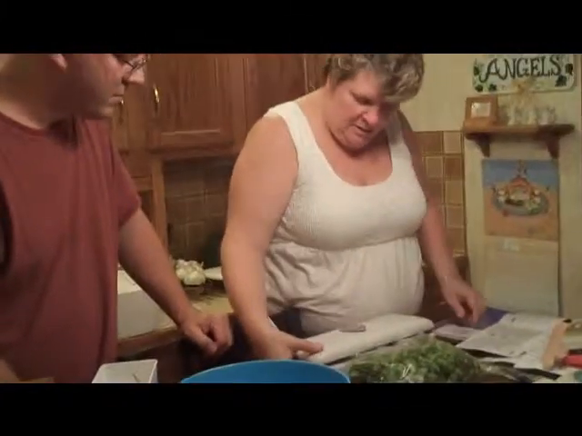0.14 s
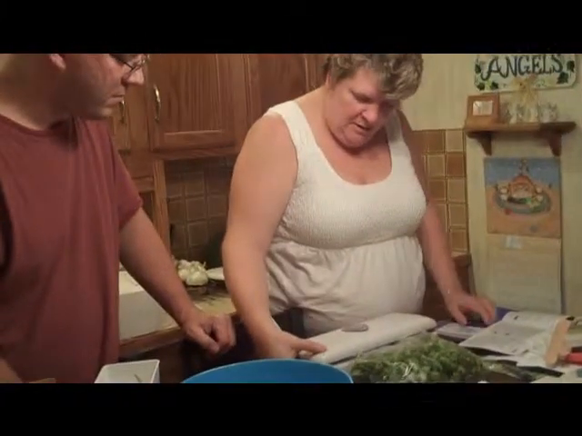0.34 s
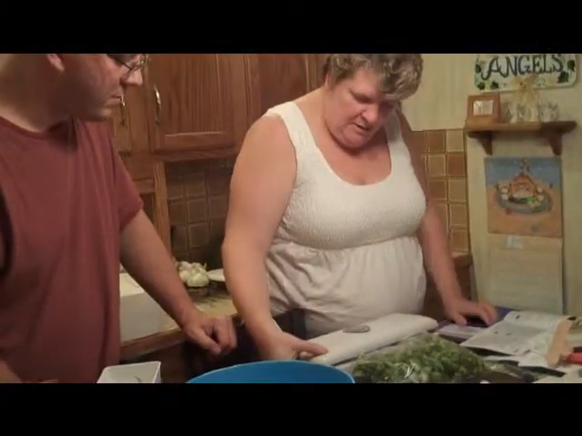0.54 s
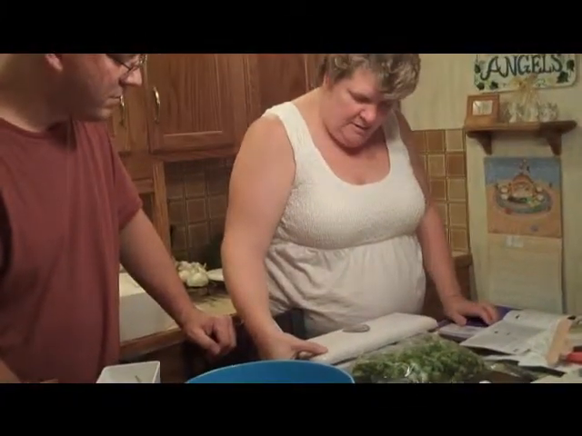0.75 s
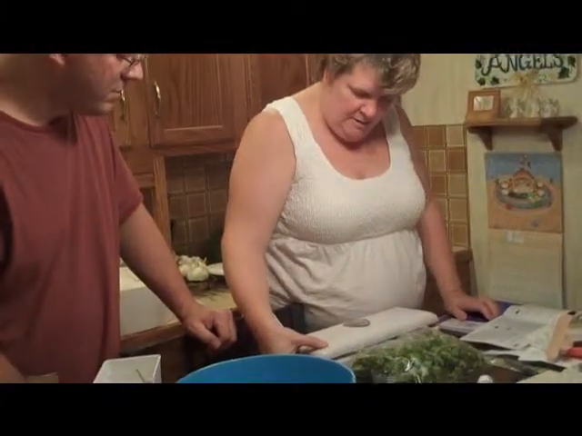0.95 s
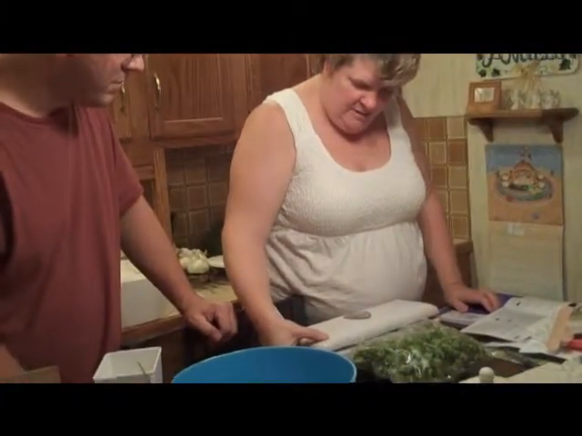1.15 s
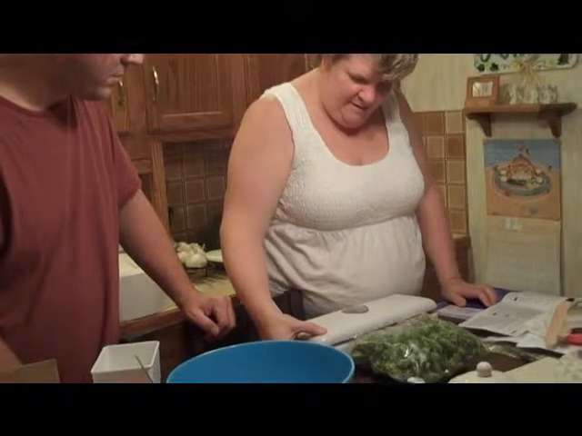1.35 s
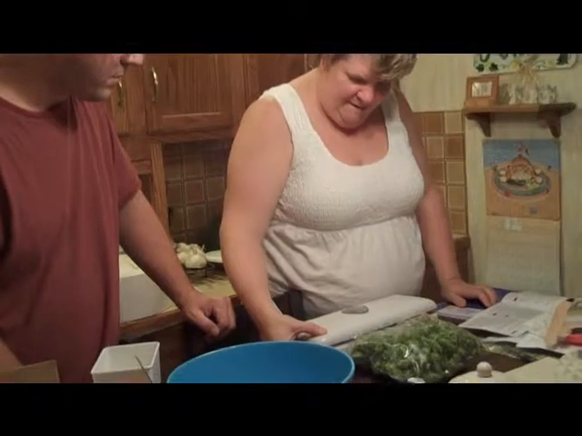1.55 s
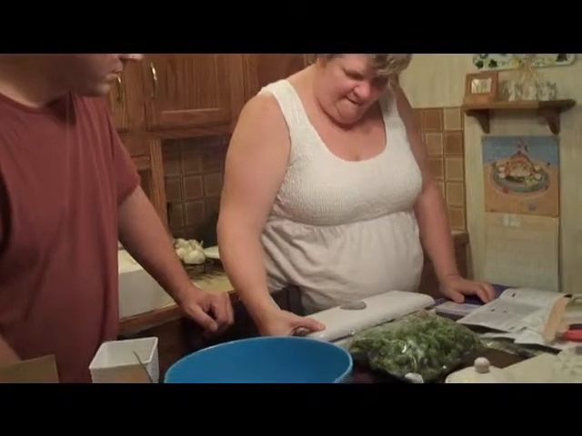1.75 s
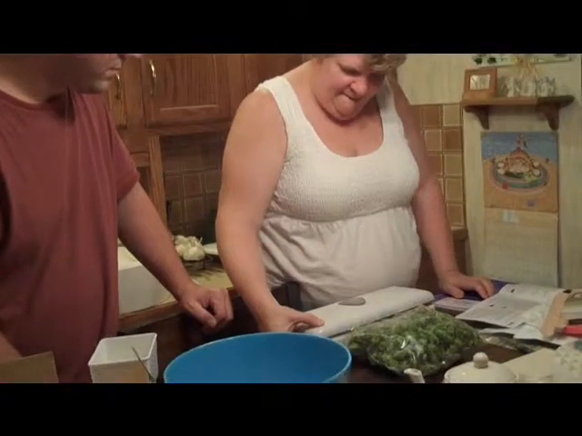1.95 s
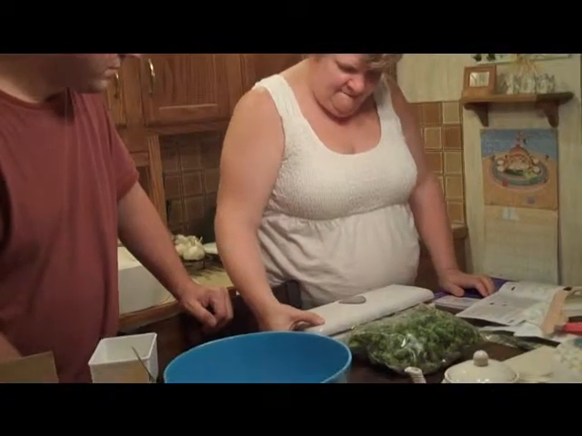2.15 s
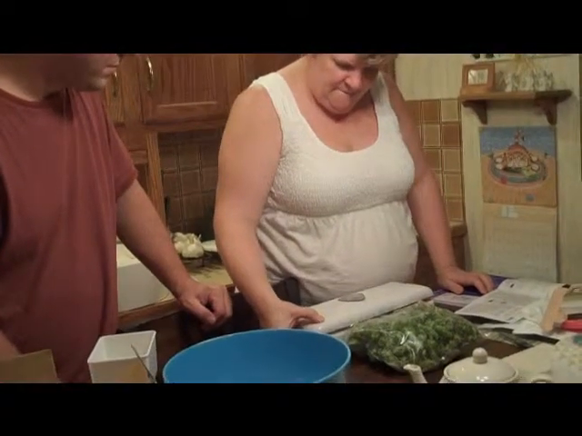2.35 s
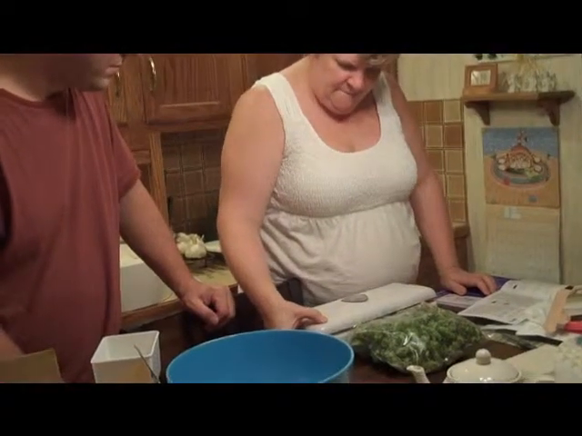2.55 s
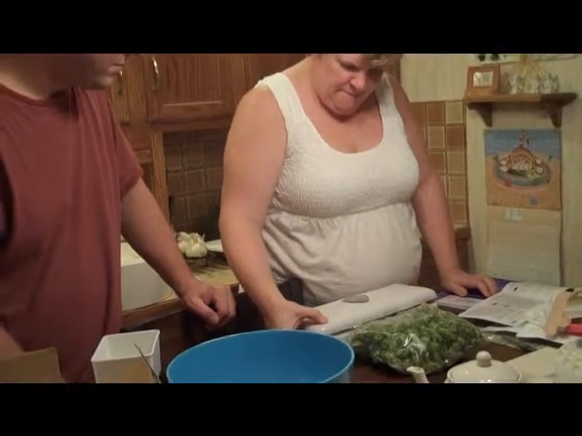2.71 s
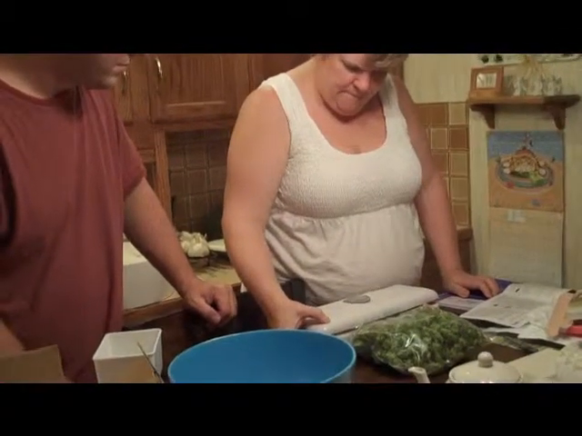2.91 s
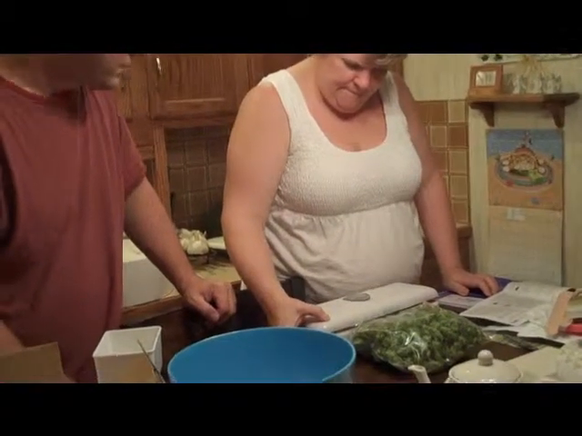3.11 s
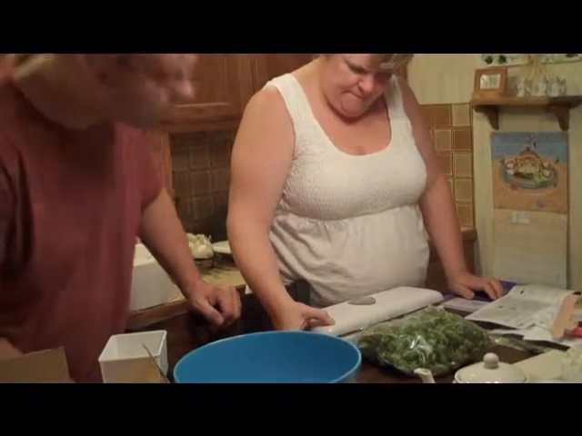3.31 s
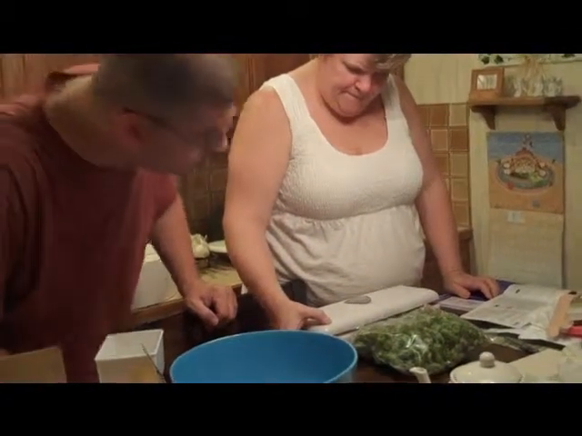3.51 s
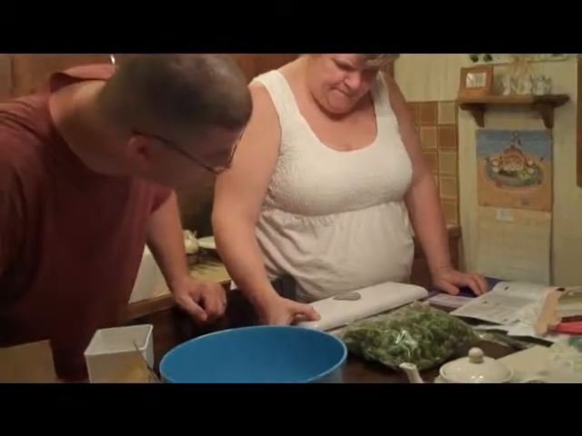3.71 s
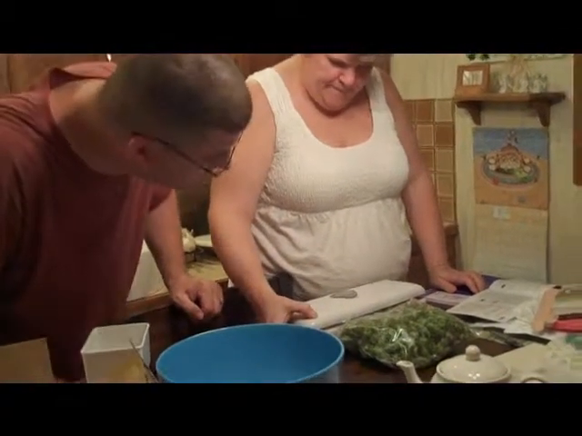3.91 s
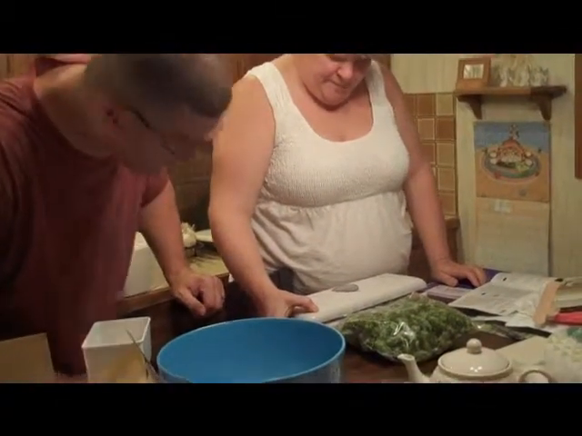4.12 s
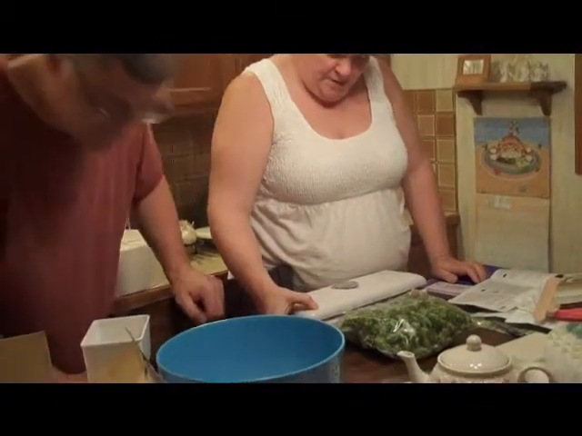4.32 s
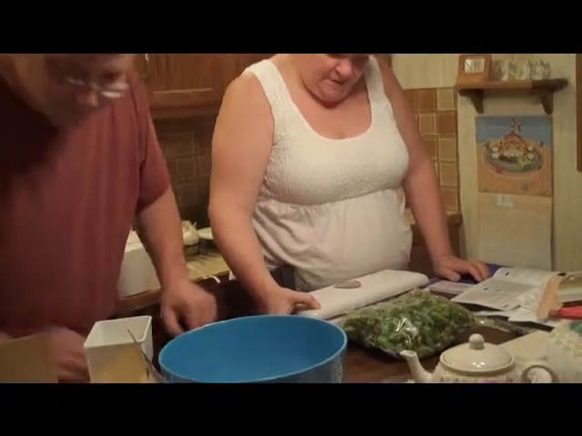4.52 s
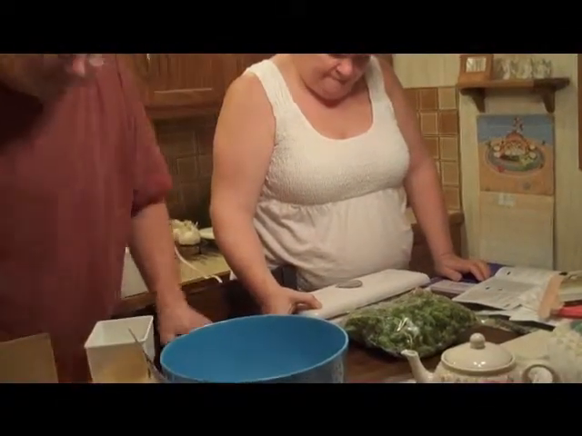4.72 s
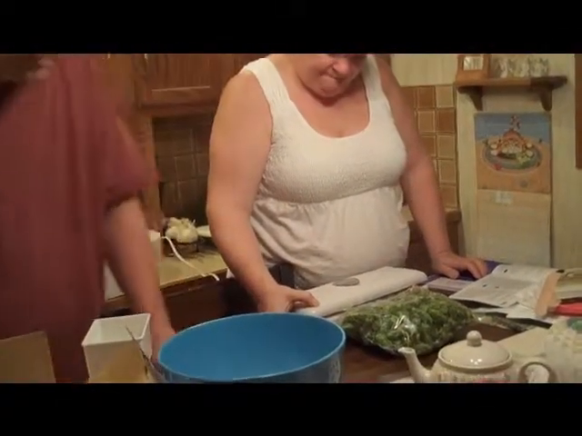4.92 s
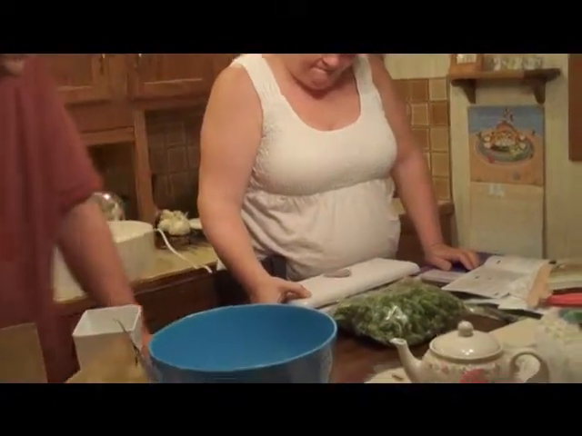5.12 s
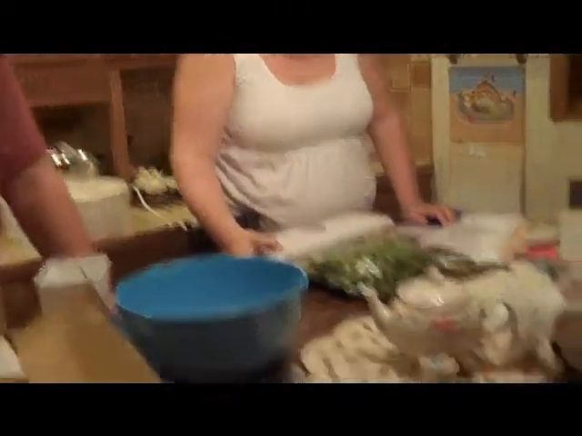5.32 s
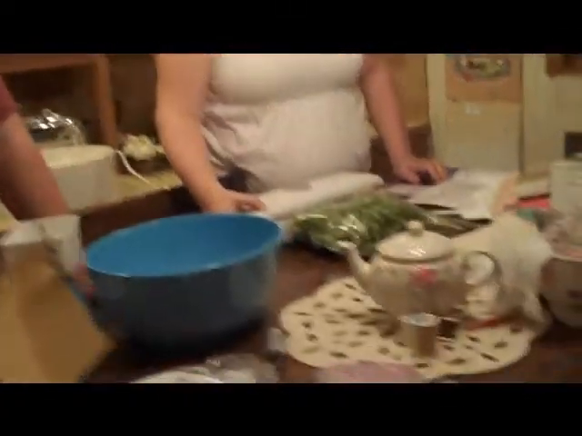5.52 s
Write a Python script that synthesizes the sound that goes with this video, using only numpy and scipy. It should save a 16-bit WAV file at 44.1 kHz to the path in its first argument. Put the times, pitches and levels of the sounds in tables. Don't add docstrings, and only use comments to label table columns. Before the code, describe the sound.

A quiet kitchen with faint mains hum, then a crisp plastic switch click. A countertop vacuum sealer knocks unevenly as its motor starts, sweeps quickly upward in pitch, and settles into a loud, nasal whine with brushy air hiss. The whine creeps very slightly higher until the end. Close stereo handheld microphone, small hard room, treble stronger on the left.

```python
import sys
import numpy as np
from scipy import signal
from scipy.io import wavfile
from scipy.ndimage import uniform_filter1d

SR = 44100
rng = np.random.default_rng(int(sys.argv[2]) if len(sys.argv) > 2 else 0)


def invert_db(level):
    return 10 ** (np.asarray(level, dtype=float) / 20)


def put_to_file(sound):
    columns = np.atleast_2d(sound).T
    safe = np.clip(columns, -1, 1)
    whole_steps = np.round(safe * 32767)
    wavfile.write(sys.argv[1], SR, whole_steps.astype(np.int16))


N = 249517
TIME = np.arange(N) / SR

# frequency in Hz, left level in dB, right level in dB, likeness of the two sides (1 = same).
HISS_COLOUR = [(60, -19, -18, 1), (204, -15.5, -15, 0.97), (298, -4, -5, 0.98), (676, -0.5, 0.5, 0.95),
               (1300, 0.5, -1, 0.76), (2950, -2, -4, 0.2), (3220, -4, -1.5, 0.22),
               (4200, -7.5, -10.5, 0.88), (5420, -9, -6.5, 1), (5760, -14, -6.5, 1), (7930, 10, -9, 0.73),
               (8740, -10, -23, 0.064), (9500, -17, -56, 0.13), (11700, -2.5, -37, .2)]


def in_time(rows):
    seconds, *columns = np.transpose(rows)
    return [np.interp(TIME, seconds, column) for column in columns]


def at_hz(table, hz, axis=1):
    table = np.array(table)
    return np.interp(np.log(hz), np.log(table[:, 0]), table[:, axis])


def drift(rate_hz):
    step = 40
    r = np.exp(-2 * np.pi * rate_hz * step / SR)
    slow = signal.lfilter([1], [1, -2 * r, r * r], rng.standard_normal(N // step + 2002))[2000:]
    return np.interp(np.arange(N) / step, np.arange(len(slow)), slow / slow.std())


def banded_noise(left_db, right_db, alike, band_gain):
    out, power = 0, 0
    edges_hz = 30 * 2 ** (np.arange(28) / 3)
    white = rng.standard_normal((2, 2, N))
    for k, (low, high) in enumerate(zip(edges_hz, edges_hz[1:])):
        band_pass = signal.butter(2, [low, high], "band", fs=SR, output="sos")
        mid, side = signal.sosfilt(band_pass, white[k % 2])
        hz = np.sqrt(low * high)
        likeness = np.clip(alike(hz), 0, 1)
        shared = np.sqrt(1 + likeness) * mid
        opposed = np.sqrt(1 - likeness) * side * [[1], [-1]]
        band = invert_db(np.array([[left_db(hz)], [right_db(hz)]])) * (shared + opposed)
        power = power + np.mean(band ** 2)
        out = out + band * band_gain(hz)
    return out / np.sqrt(power)


def ring(clicks, hz, t60):
    r, w = invert_db(-60 / (t60 * SR)), 2 * np.pi * hz / SR
    return signal.lfilter([0, np.sin(w)], [1, -2 * r * np.cos(w), r * r], clicks + 1e-18)


def room_floor():
    # frequency in Hz, noise level in dB.
    floor_colour = [(30, -4), (60, 5.5), (85, -16), (150, -2), (300, 2), (550, -8.5), (1000, 0),
                    (2100, -1.5), (4500, -13), (7500, -52), (9000, -40), (11000, -24), (13000, -46)]
    # frequency in Hz, left minus right in dB.
    floor_lean = [(60, -4), (110, 4), (200, 4), (360, -4), (640, -3), (1160, -11), (2100, -2), (3800, -5),
                  (6880, -20), (12400, 29)]
    # hum frequency in Hz, level in dB.
    mains_hum = [(60, -72), (120, -75.5), (180, -73), (240, -71)]
    floor_db = -53.5

    def left_db(hz):
        return at_hz(floor_colour, hz) + at_hz(floor_lean, hz) / 2

    def right_db(hz):
        return at_hz(floor_colour, hz) - at_hz(floor_lean, hz) / 2

    def alike(hz):
        return 0.8 - 0.027 * np.log2(hz / 100)

    noise = banded_noise(left_db, right_db, alike, lambda hz: 1)
    hum = sum(invert_db(db) * np.sqrt(2) * np.sin(2 * np.pi * hz * TIME) for hz, db in mains_hum)
    return invert_db(floor_db) * noise + hum


def switch():
    # time in seconds, peak in dB.
    contacts = [(0.366, -43), (.3695, -47), (.3742, -46), (0.3755, -29), (.3762, -25), (.3770, -20),
                (0.378, -21), (0.3793, -23), (0.3801, -26), (.3812, -27), (0.3840, -30), (.3875, -33)]
    # frequency in Hz, level in dB, time to die by 60 dB in seconds.
    plastic_modes = [(1280, -23, 0.0073), (2510, -8, 0.013), (3100, -18, 0.0066), (3650, -12, 0.011),
                     (4300, 1, 0.0063), (4960, 8, 0.0014), (6130, 5, 0.0059), (6130, -20, 0.0078),
                     (6900, -1, 0.0029), (8000, -8, 0.01), (9170, -9, 0.011)]
    kitchen_t60_s = 0.18

    at = [round(s * SR) for s, db in contacts]
    contact_db = np.array(contacts)[:, 1]
    click = np.zeros(SR)
    strength = rng.normal(0, 1, (len(at), len(plastic_modes)))
    for (hz, level_db, t60), chance in zip(plastic_modes, strength.T):
        strikes = np.zeros(SR)
        strikes[at] = invert_db(contact_db + level_db - 4.5 + 2.7 * chance) * np.sign(chance[::-1])
        click += ring(strikes, hz, t60)
    click = signal.sosfilt(signal.butter(2, [1300, 8800], "band", fs=SR, output="sos"), click)

    lag_s = np.arange(SR // 2) / SR
    echoes = rng.standard_normal((2, len(lag_s))) * invert_db(-60 * lag_s / kitchen_t60_s) * (lag_s > 0.003)
    tail = signal.fftconvolve(click[None], echoes, axes=1)[:, :SR]
    direct = click * invert_db(np.array([[-0.5], [0.5]]))
    return np.pad(direct + invert_db(-30.5) * tail, ((0, 0), (0, N - SR)))


def start_judder(turns):
    # time in seconds, judder level in dB.
    judder_level = [
        (.428, -80),
        (.436, -40),
        (.46, -48),
        (.5, -39.5),
        (.55, -38.5),
        (.6, -49),
        (.68, -39.5),
        (.75, -45),
        (.85, -78),
    ]
    # frequency in Hz, level in dB, time to die by 60 dB in seconds.
    judder_modes = [(665, -1, 0.24), (910, -3, 0.019), (1235, 9, 0.031), (1460, 7, 0.045), (2560, 0, 0.018)]

    knocks = np.diff(np.floor(turns + 0.15 * drift(60.0)), prepend=0) > 0
    out = sum(ring(knocks * invert_db(db + 4 * drift(40.0)), hz, t60) for hz, db, t60 in judder_modes)
    out = signal.sosfilt(signal.butter(4, 520, "high", fs=SR, output="sos"), out)
    starting = TIME < judder_level[-1][0]
    return invert_db(in_time(judder_level)[0]) * out / out[:SR].std() * starting


def pump_hiss(turns, hiss_db, tilt_db):
    throb = 1 + 0.051 * np.cos(2 * np.pi * turns) + 0.08 * np.cos(4 * np.pi * turns)
    together = drift(4.5)

    def patch(hz):
        return invert_db(tilt_db * np.log2(hz / 2000) + 0.5 * together + 0.58 * drift(11.0))

    hiss = banded_noise(lambda hz: at_hz(HISS_COLOUR, hz),
                        lambda hz: at_hz(HISS_COLOUR, hz, axis=2),
                        lambda hz: at_hz(HISS_COLOUR, hz, axis=3), patch)
    hiss = signal.sosfilt(signal.butter(3, 8600, fs=SR, output="sos"), hiss)
    return invert_db(hiss_db) * throb * hiss


def wall_ripple_db(hz):
    echo_delays = [.0031, .0057, .0093, .0141, .0219]
    grid_hz = np.arange(0, 13000, 4.0)
    echoes = sum(np.exp(2j * np.pi * grid_hz * lag) for lag in echo_delays)
    ripple = np.abs(1 + 0.42 * echoes) + 0.15
    return np.interp(hz, grid_hz, 20 * np.log10(ripple) - 3)


def casing_db(hz):
    # frequency in Hz, half width in Hz, level in dB.
    casing_rings = [(496, 95, -28), (639, 26, 13), (900, 14, 5), (925, 18, -1), (977, 32, 9), (1240, 45, 8),
                    (1450, 35, 5.5), (1510, 68, 11), (1638, 14, 12), (1685, 10, 5), (2320, 82, 2),
                    (2690, 170, 5.5), (5860, 600, -0.5), (9600, 370, -4)]
    # frequency in Hz, half width in Hz, level in dB.
    nulls = [(330, 3, -8), (695, 6, -9), (775, 25, -14), (970, 9, -12), (1105, 30, -17), (1200, 10, -14),
             (1320, 14, -10), (1392, 8, -9), (1482, 5, -8), (1540, 8, -10), (1580, 7, -22), (1632, 4, -16),
             (1657, 4, -14), (1735, 18, -6)]
    lid, motor_shell = (4300, 300, 6.0), (7450, 280, 11.0)
    rings = casing_rings + nulls + [lid, motor_shell]
    deep_db = 40 * np.minimum(np.log2(hz / 290), 0)
    return deep_db + sum(db / (1 + ((hz - centre_hz) / width_hz) ** 2) for centre_hz, width_hz, db in rings)


def motor_tones(speed, turns, tones_db):
    # multiple of the turning rate, level in dB, growth in dB per second,
    # left minus right in dB.
    orders = [(1, -42, 0.5, -2), (2, -51.5, -1.5, -1), (3, -38, 3.25, 0.5), (4, -47.5, -2.5, 1),
              (5, -38.5, 0.43, -1), (6, -45, -1, -1), (7, -43.5, 0.0, -2.5), (8, -40, 2.5, -3),
              (9, -48, -0.5, 4), (10, -46.5, 1.95, -4.5), (11, -88, 2.5, 2), (12, -48.5, 1.5, -4),
              (13, -53, -0.8, -2), (14, -59, 3, 26), (15, -59, 0.5, -2), (16, -47, 2, -7),
              (17, -48, -0.4, 6), (18, -48, 0, -13), (19, -81, 7, 10), (20, -45.5, 0.5, 2.5),
              (21, -45, -1.5, 23), (22, -42.5, 4, 23), (23, -47, -1, 13), (24, -57, -4, 7),
              (25, -60, -0.5, 8), (26, -91, -5, 12), (29, -75, -6, 20), (30, -54, -0.6, 36),
              (32, -62.5, -5.5, 48), (34, -63, -2.5, 37)]
    # time in seconds,
    # order, change in dB, half length in seconds.
    swells = [(5.56, 1, 7.5, 0.29), (1.26, 1, 8.5, 0.51), (5.3, 2, 9.5, 0.48), (1.42, 2, 11.5, 0.35),
              (1.1, 3, -6, 0.38), (4.3, 3, 2.6, .11), (0.88, 15, 4.5, .12), (4.89, 3, -3.5, 0.086),
              (5.16, 3, -4.5, 0.11), (4.64, 4, 5, 0.31), (5.27, 4, 14.5, 0.36), (3.15, 5, 6, 0.69),
              (4.31, 5, 5.5, 0.1), (4.61, 5, -4.1, 0.16), (5.59, 5, 7, 0.074), (2.1, 15, 6, .45),
              (3.81, 6, 7.5, 0.17), (5.34, 6, 9, 0.32), (4.4, 7, -8, 0.45), (4.5, 8, 3.5, 0.36),
              (5.11, 8, 5, 0.25), (5.54, 8, -8.5, 0.16), (3.61, 10, 5.5, 0.38), (.68, 20, 0, 0.15),
              (1.45, 21, 7.5, 0.53), (4.7, 21, 2.5, 0.45), (1.38, 22, 14, 0.15), (3.65, 22, 4.1, .21),
              (5.41, 22, -7.5, 0.17), (0.48, 30, -2, 0.049)]
    # frequency in Hz, lead in radians.
    left_lead = [(360, 0.15), (1450, -0.029), (1800, -0.51), (2500, 0.63), (3600, -0.71), (6500, -0.95),
                 (8300, -1.2), (11500, -2.17)]
    slots = 5
    top_slot_order = 30

    out = np.zeros((2, N))
    running = np.clip((TIME - 0.41) / 0.02, 0, 1)
    slow_time = TIME[::32]
    acceleration = np.gradient(speed) * SR
    gliding = np.clip(acceleration / 30, 0, 1)
    rushing = np.clip(acceleration / 90, 0, 1)
    for k, level_db, growth_db, lean_db in orders:
        hz = k * speed
        final_hz = hz[-1]
        left, right = (at_hz(HISS_COLOUR, hz, axis=c) - at_hz(HISS_COLOUR, final_hz, axis=c) for c in (1, 2))
        lean = lean_db + left - right + (0.096 + 0.023 * min(k, 10)) * drift(1.1)

        colour = casing_db(hz[::32]) - casing_db(final_hz)
        for s, order, db, half_s in swells:
            if order == k:
                colour = colour + db * np.exp(-((slow_time - s) / half_s) ** 2)

        level = level_db + growth_db * np.maximum(TIME - 3.6, -2) + tones_db
        level = level + np.interp(TIME, slow_time, colour) + 0.14 * np.maximum(left, right)
        ripple_share = 1.4 if k > slots else 0.3
        level = level + rushing * ripple_share * wall_ripple_db(hz)
        pull_db = 5.5 if k % slots == 0 and k <= top_slot_order else -4.0
        level = level + gliding * pull_db
        level = level + (0.097 + 0.044 * k) * drift(1.9) + (1.04 + 0.081 * k) * drift(18.3)

        angle = 2 * np.pi * (k * turns + rng.random())
        blur = 0.012 + 0.0003 * k + 0.018 * gliding * (k > 8)
        angle += blur * k * drift(40.0)

        gain = invert_db(level) * np.sqrt(2 / (1 + invert_db(-2 * lean)))
        out[0] += gain * np.sin(angle + at_hz(left_lead, final_hz))
        out[1] += gain * invert_db(-lean) * np.sin(angle)
    return np.sqrt(2) * running * out


def scene():
    # time in seconds, turns per second.
    motor_speed = [(.37, 60), (.43, 112), (.49, 128), (.53, 147), (.57, 178), (.62, 206), (.75, 261),
                   (.81, 277.5), (.88, 293.7), (1.0, 313.6), (1.13, 329), (1.27, 339.6), (1.45, 347),
                   (1.75, 352.7), (2.0, 354.4), (3.2, 357.2), (4.6, 359.0), (5.3, 360.6)]
    # time in seconds, hiss in dB, tones in dB, hiss tilt in dB per octave.
    pump_effort = [(.36, -49.5, -30, 0), (.4, -45, -25, 1), (.45, -44, -29, 1), (.55, -41.5, -12.5, 0.5),
                   (.65, -39.5, -6.5, 2), (.75, -36.5, -6, 1.5), (.9, -35, -4.5, 1.4), (1.1, -33, -4.5, 1),
                   (1.5, -32, -1.9, 0.95), (2.2, -32, -0.2, 0.8), (3.2, -31.5, -0.83, 0.86),
                   (4.2, -31.5, -0.6, 0.93), (4.8, -31, 0, 0.7), (5.3, -31.5, -0.4, 0.7),
                   (5.66, -31, -0.7, 1)]

    speed = uniform_filter1d(in_time(motor_speed)[0], size=2000)
    turns = np.cumsum(speed + 0.366 * drift(9.04)) / SR
    hiss_db, tones_db, tilt_db = in_time(pump_effort)
    background = room_floor() + switch()
    machine = start_judder(turns) + pump_hiss(turns, hiss_db, tilt_db) + motor_tones(speed, turns, tones_db)
    return background + machine


def band_limit(x):
    return signal.sosfilt(signal.butter(12, 13040, fs=SR, output="sos"), x)


def record(dry):
    dry = signal.sosfilt(signal.butter(1, 60, "high", fs=SR, output="sos"), dry)
    dry = signal.sosfilt(signal.butter(4, 12900, fs=SR, output="sos"), dry)
    return band_limit(dry)


dry = scene()
out = record(dry)
put_to_file(out)
```